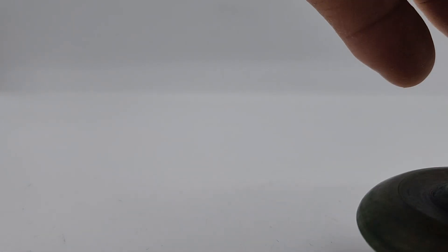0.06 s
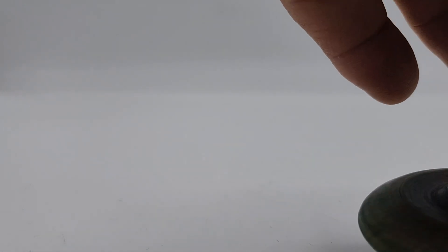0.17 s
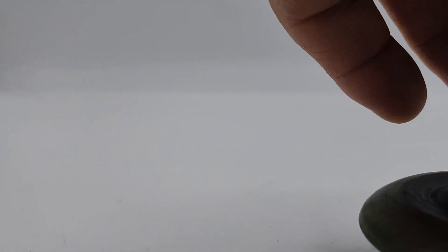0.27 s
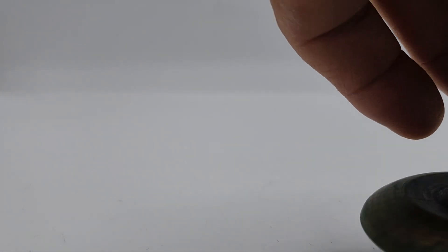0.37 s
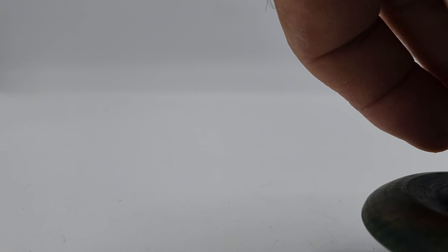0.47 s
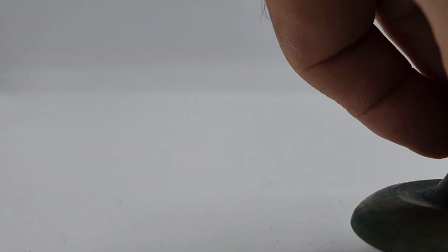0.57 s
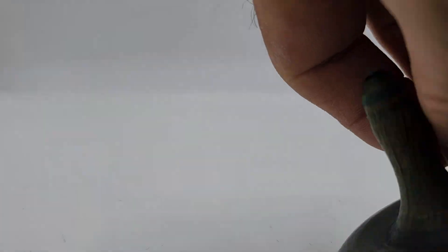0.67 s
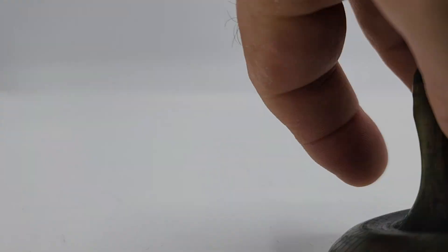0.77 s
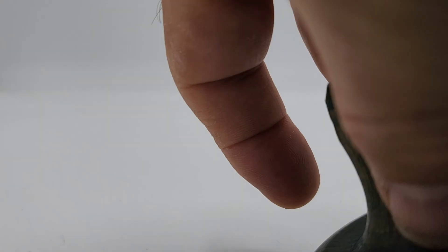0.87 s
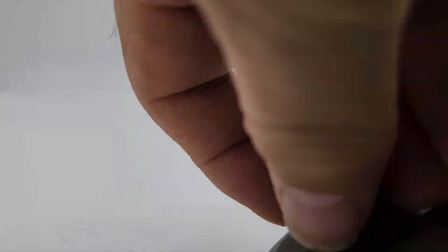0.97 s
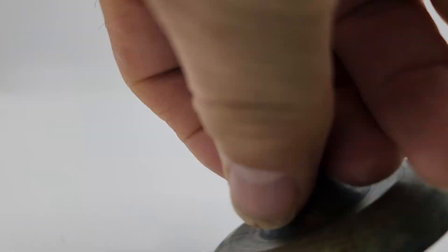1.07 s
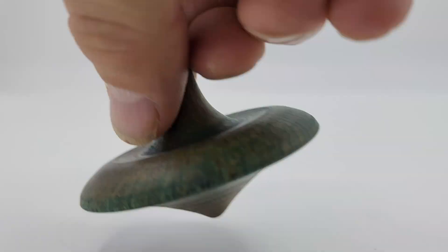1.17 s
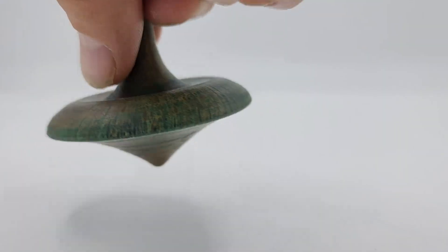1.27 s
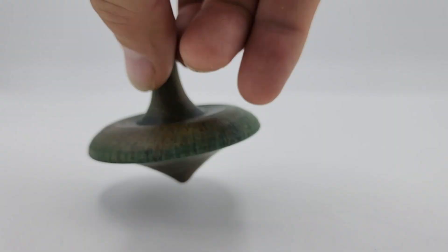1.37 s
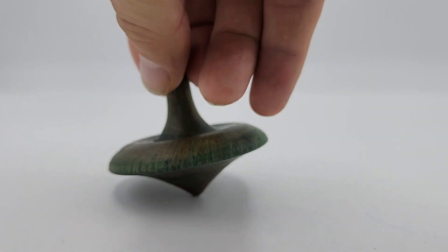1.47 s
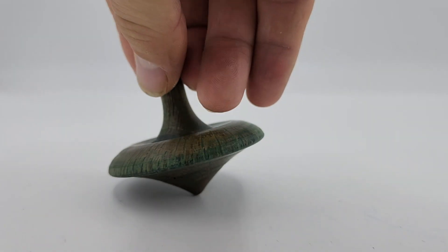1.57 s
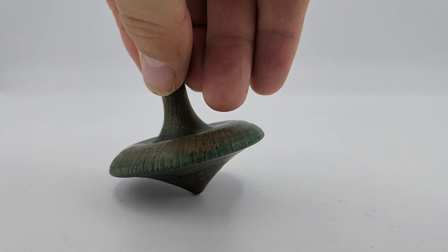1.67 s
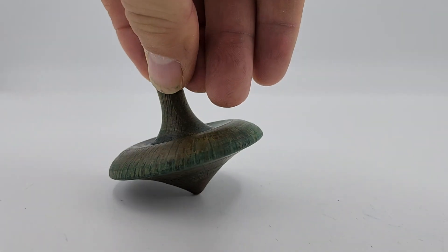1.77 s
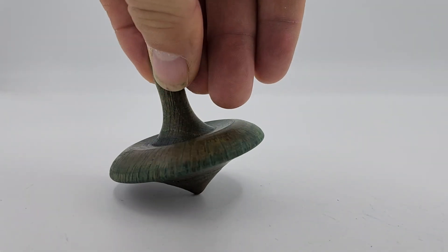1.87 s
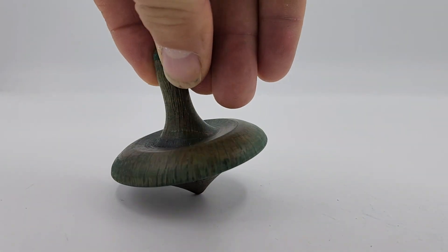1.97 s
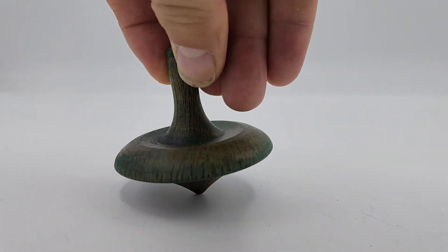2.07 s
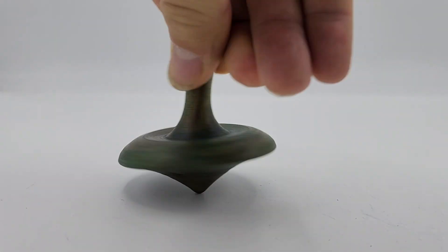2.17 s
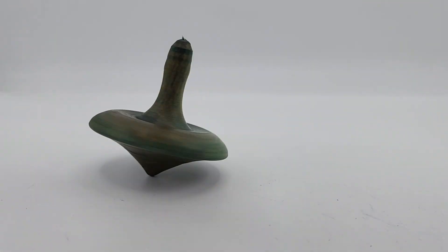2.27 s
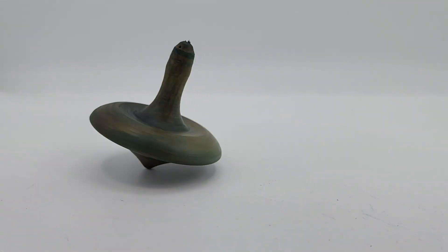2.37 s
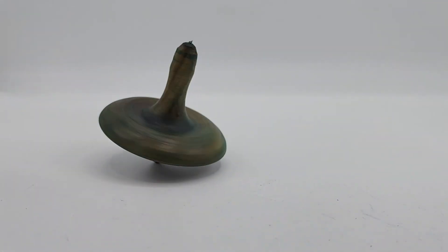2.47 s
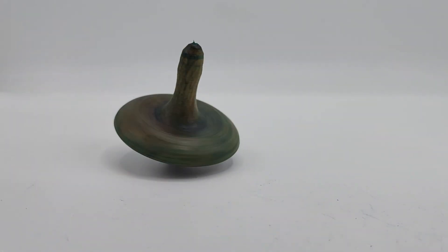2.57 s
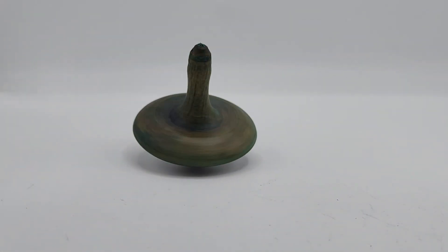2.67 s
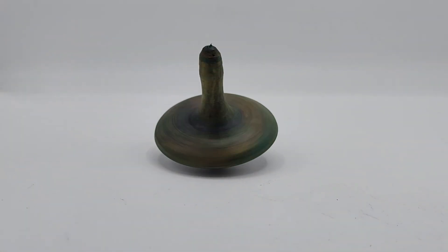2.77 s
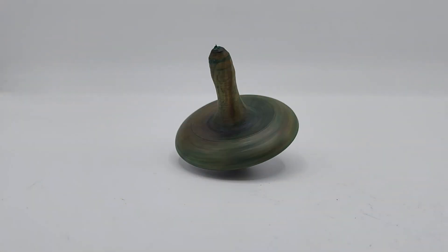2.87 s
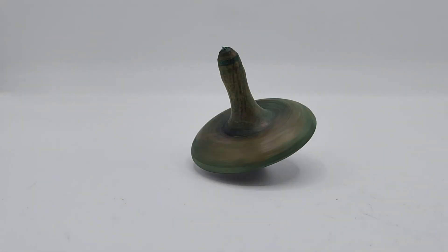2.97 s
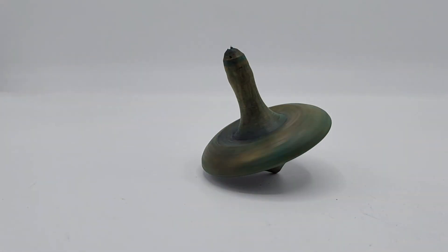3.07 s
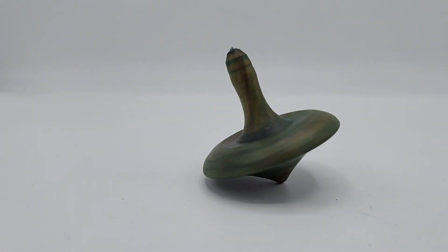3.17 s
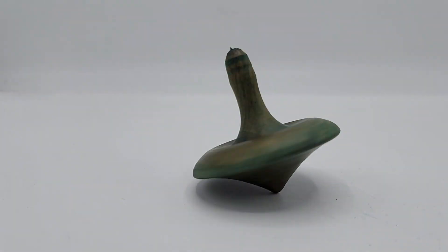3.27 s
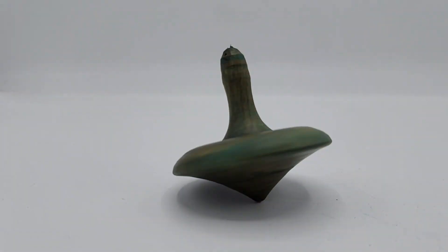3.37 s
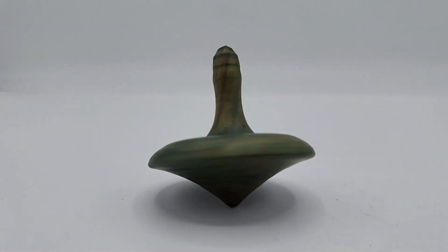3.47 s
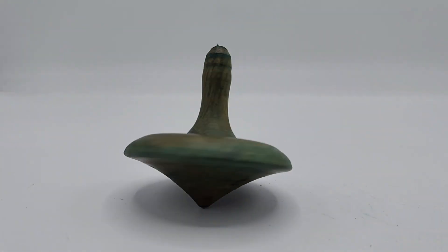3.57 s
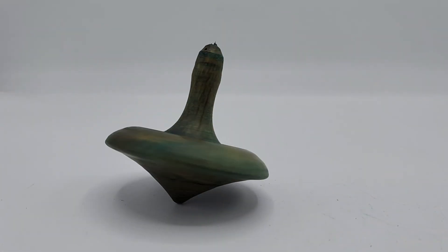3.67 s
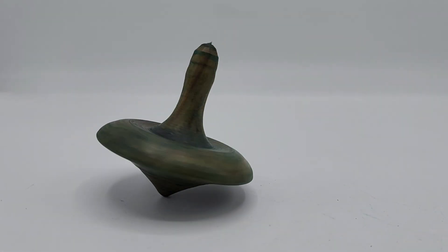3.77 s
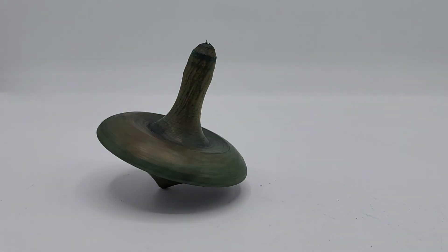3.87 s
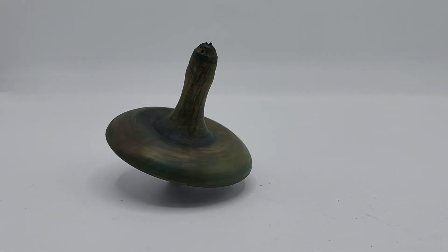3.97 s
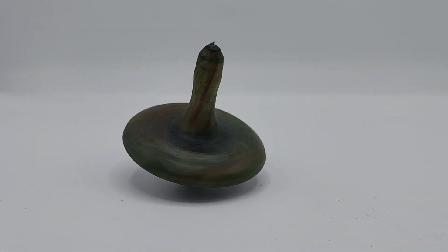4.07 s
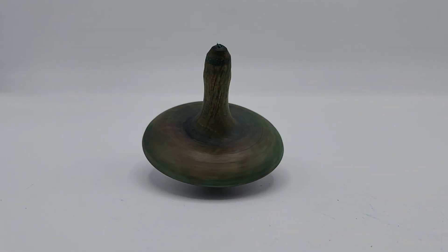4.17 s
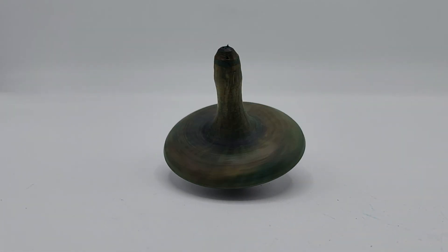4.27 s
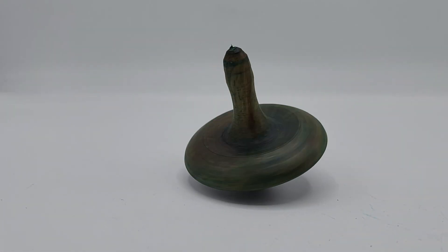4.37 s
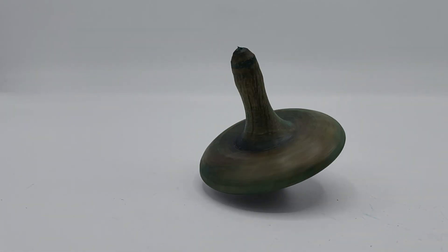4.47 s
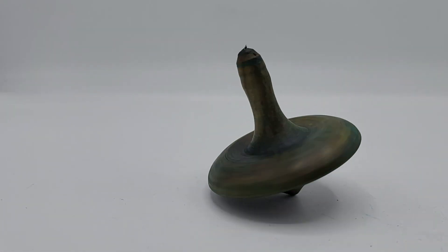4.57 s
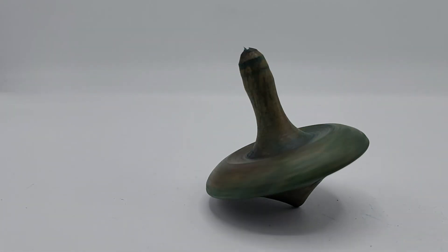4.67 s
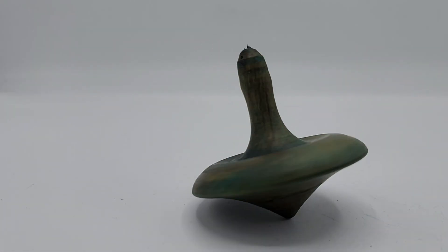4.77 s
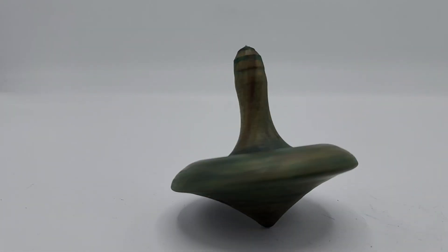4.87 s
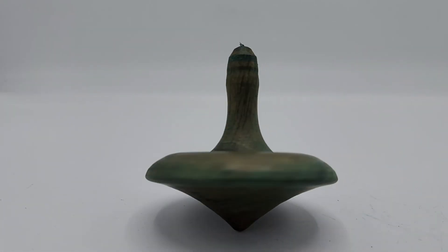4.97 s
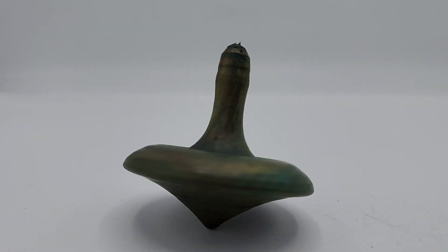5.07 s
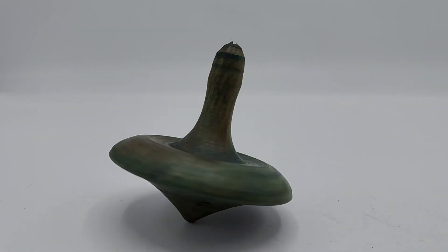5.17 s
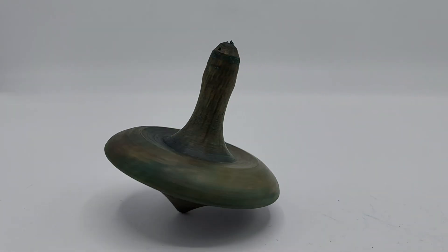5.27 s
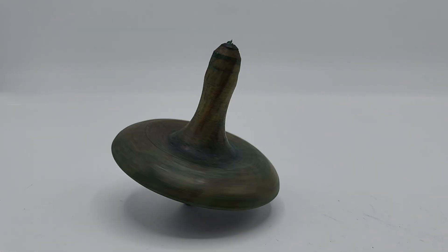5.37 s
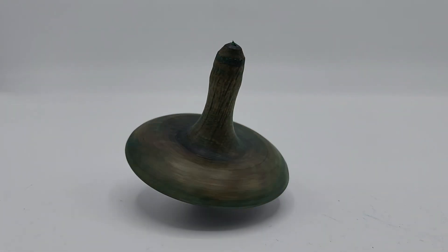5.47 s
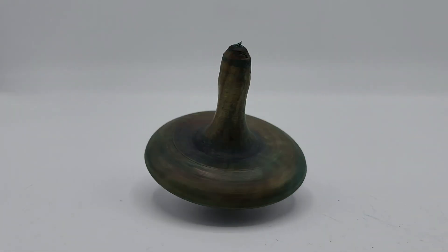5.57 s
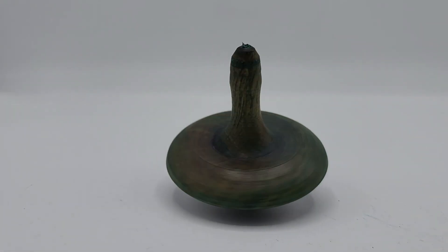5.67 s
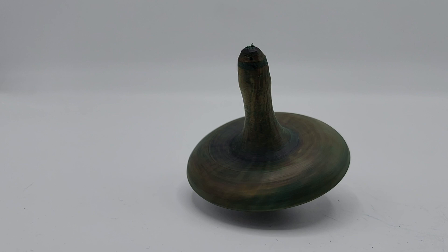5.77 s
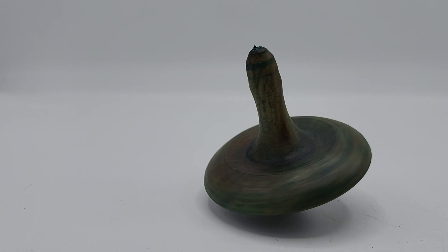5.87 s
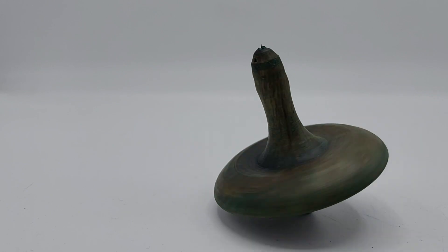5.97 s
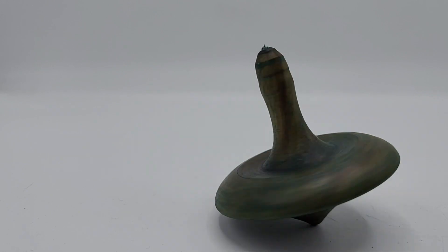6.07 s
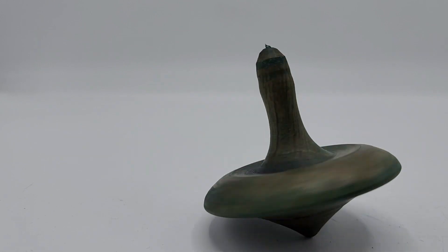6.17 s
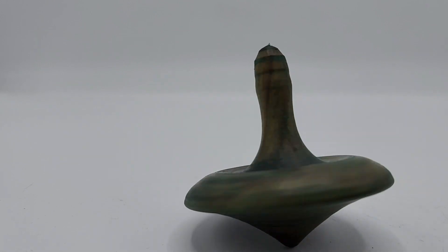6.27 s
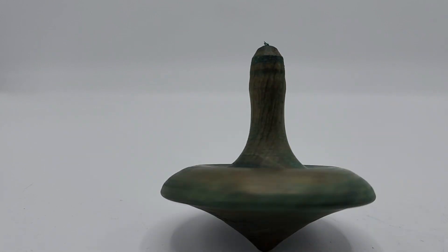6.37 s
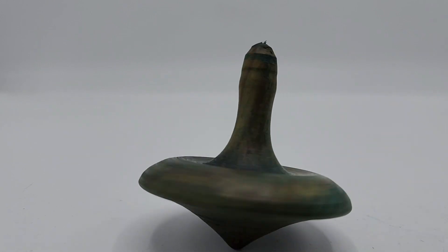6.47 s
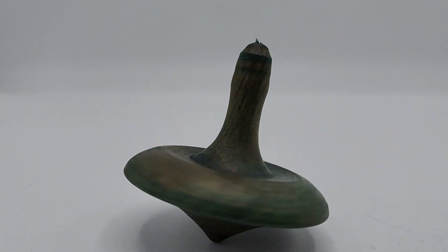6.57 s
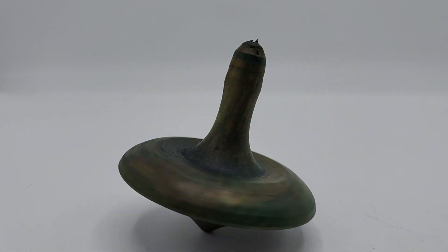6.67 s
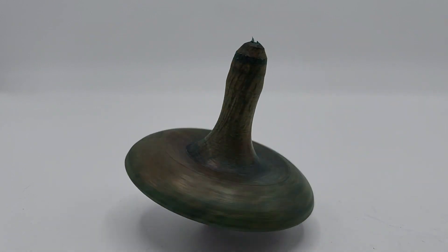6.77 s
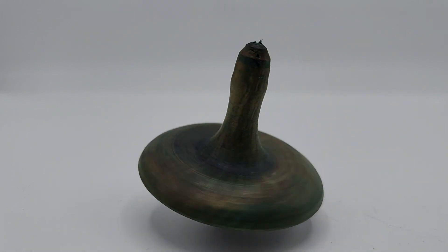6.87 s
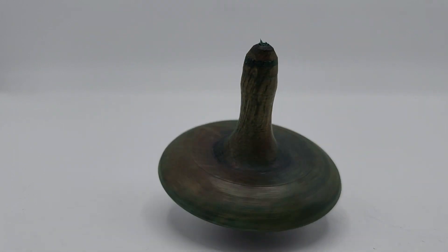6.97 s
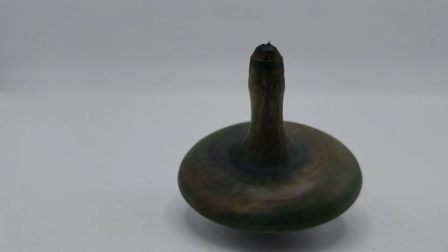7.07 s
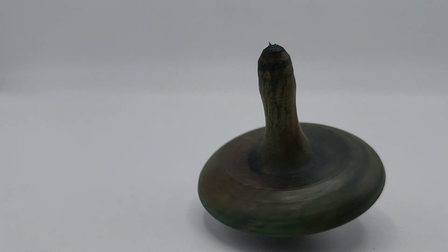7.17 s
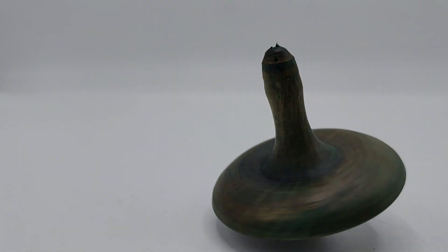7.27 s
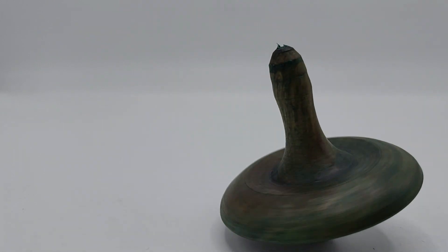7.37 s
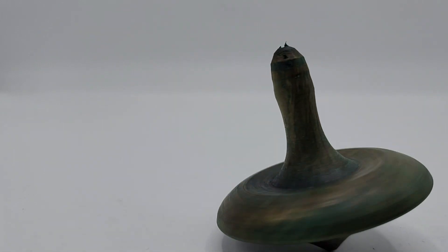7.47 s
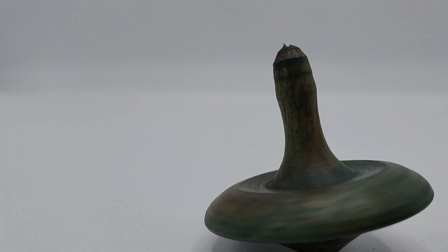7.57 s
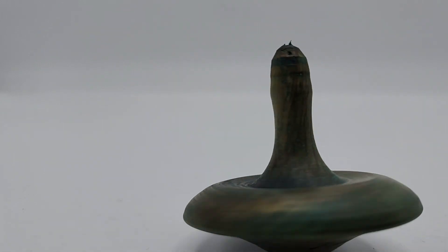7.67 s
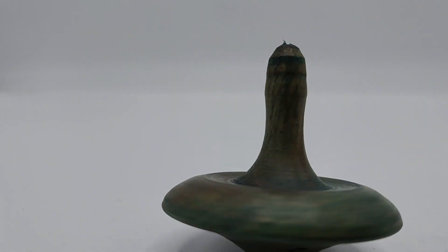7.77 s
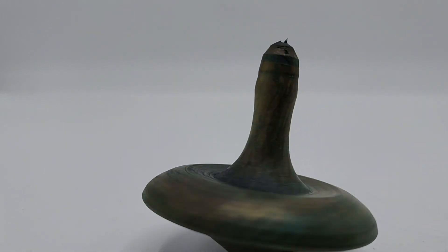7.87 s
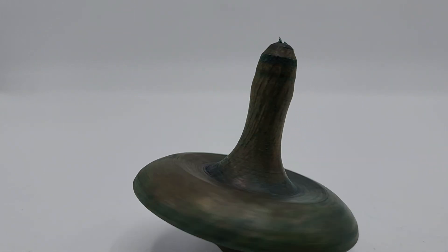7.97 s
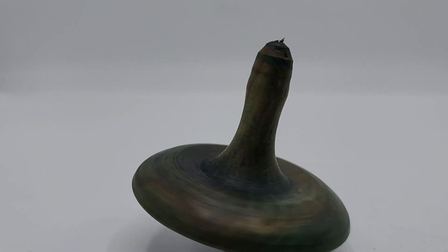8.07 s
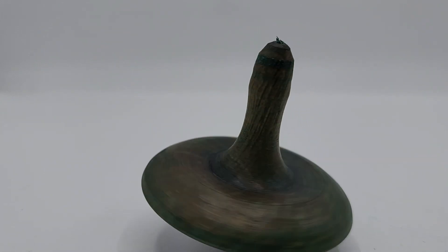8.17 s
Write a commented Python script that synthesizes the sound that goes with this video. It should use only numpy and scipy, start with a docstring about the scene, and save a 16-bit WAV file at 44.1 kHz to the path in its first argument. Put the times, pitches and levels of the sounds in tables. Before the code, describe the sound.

Fingers brush and knock against a wooden top as they pick it up from a hard board. It is set down with one sharp knock, then twirled with a quick rasp of skin and a few more knocks. The top spins with a low, fluttering rumble that swells and eases in slow waves, its tip grinding faintly. Everything is heard close up over the soft hum of a quiet room.

```python
"""Over the hum of a quiet room, skin and sleeve brush and knocks sound close by: fingers pick a wooden
top off a hard board, set it down and twirl it. Its uneven tip bumps the board three times a turn and
drives the low modes into a rumble. Friction slows the top evenly, and the rumble swells once in each
slow circle of its leaning axis (precession). The tip grinds faintly, snaps grit and chirps."""
import sys
import numpy as np
from scipy import signal
from scipy.fft import rfft, irfft
from scipy.io import wavfile
from scipy.ndimage import uniform_filter1d

SR = 44100
rng = np.random.default_rng(int(sys.argv[2]) if len(sys.argv) > 2 else 0)


def store_pcm(level_fs):
    """Save levels as 16-bit WAV."""
    pcm = np.round(np.clip(level_fs, -1, 1) * 32767).astype(np.int16)
    wavfile.write(sys.argv[1], SR, np.atleast_2d(pcm).T)


N = 362943
T = np.arange(N) / SR

# Noise spectra. Each row: frequency in Hz, relative spectral density in dB.
ROOM_SPECTRUM = [(15, -59.5), (25, 3), (75, -11), (133, 5), (281, -29.5), (399, -20.5), (509, -33.5),
                 (1340, -38), (1620, -38.5), (2170, -45), (2490, -46), (4040, -48), (6400, -48),
                 (7600, -39.5), (9300, -61.5), (15500, -54.5)]
HISS_SPECTRUM = [(400, -3), (1000, -21), (1800, -14), (3000, -6.5), (4600, -9), (7500, -0.5), (9500, -7.5),
                 (12000, -4), (15500, -5)]
BRUSH_SPECTRUM = [(150, -24), (330, 3), (620, -2.5), (1000, -13.5), (1500, -15.5), (3000, -24),
                  (8000, -51.5)]
TICK_SPECTRUM = [(300, 6), (900, 3.5), (1400, 7), (2000, 2), (3500, -0.5), (7000, -10.5), (10000, -30),
                 (15500, -27)]
DRY_FRICTION_SPECTRUM = [(700, -21), (1050, 1.5), (1230, -2), (1500, -11.5), (1800, -23), (2050, -6),
                         (2500, -18.5), (3200, -9), (4500, -16), (7000, -37), (12000, -47)]
SKIN_SPECTRUM = [(2500, -22), (4300, -.5), (5400, 1), (6200, -1), (7500, -10), (9000, -35),
                 (10600, -22.5), (12000, -35.5)]
# Normal modes of the board. Each row: frequency in Hz, bandwidth in Hz, gain in dB, polarity.
BOARD_MODES = [(75, 18.1, 13.5, -1), (78.66, 16.4, 14, 1), (113.2, 12, -3.5, -1), (125.2, 24.6, -2, 1),
               (152, 14.1, -8, 1), (164.2, 11, -11.5, 1), (343.9, 25, -2, 1), (384, 7.2, -12, 1),
               (418, 24, -11, 1), (603, 15, -13.5, 1), (637.5, 37, -13.5, 1), (873, 22, -16, 1),
               (1035, 20, -24, 1), (1096, 130, -26.5, 1), (1173, 39, -22.5, 1)]
# Skin and sleeve slide. Each row: start, rise, hold and fade in seconds, then gains in dB of
# hiss, skin rasp and scrape on the board.
SLIDES = [(0.437, 0.028, 0.16, 0.15, -81, -65, -76.5), (0.573, 0.0042, 0.019, 0.013, -43.5, -53, -44),
          (0.589, 0.016, 0.051, 0.064, -35, -48, -48.5), (0.669, 0.0072, 0.078, 0.071, -58, -47, -52.5),
          (0.751, 0.0021, 0.037, 0.14, -39, -73.5, -44.5), (0.818, 0.037, 0.067, 0.094, -91, -48, -40.5),
          (0.995, 0.022, 0.042, 0.21, -74, -59, -91), (1.136, 0.05, 0.2, 0.16, -79.5, -69.5, -71),
          (1.305, 0.052, 0.011, 0.075, -67.5, -50.5, -58.5), (1.44, 0.068, 0.013, 0.16, -77, -60, -60.5),
          (1.612, 0.014, 0.022, 0.06, -70.5, -47, -61), (2.08, 0.053, 0.013, 0.021, -40.5, -34.5, -45.5),
          (2.142, 0.011, 0.016, 0.052, -44, -37.5, -49), (2.174, 0.011, 0.01, 0.12, -59, -55, -44.5),
          (2.692, 0.13, 0.11, 0.12, -73.5, -64, -60), (3.233, 0.028, 0.051, 0.29, -78.5, -89, -84),
          (3.398, 0.1, 0.02, 0.32, -57, -52, -73), (3.539, 0.18, 0.092, 0.16, -62, -60, -59.5),
          (4.61, 0.062, 0.054, 0.43, -78, -81.5, -86)]
# The stem squeaks between fingertips. Each row: start and length in seconds, pitch in Hz, gain in dB.
STEM_SQUEAKS = [(0.455, 0.0057, 5500, -61), (0.468, 0.037, 5450, -59), (0.498, 0.046, 5600, -61),
                (0.575, 0.016, 7200, -37), (0.633, 0.04, 4603, -41.5), (0.684, .05, 5450, -45),
                (1.02, 0.032, 5750, -65), (1.159, 0.027, 5500, -70.5), (1.624, 0.03, 5150, -53),
                (2.121, 0.015, 5350, -34), (2.128, 0.015, 5330, -38)]
# Top and fingers knock. Each row: start in seconds, thud gain in dB, thud pitch in Hz,
# ring gain in dB, contact hardness in Hz, tick gain in dB.
IMPACTS = [(.555, -33.5, 134, -19, 140, -76.5), (0.577, -16.5, 126, -6, 316, -71),
           (0.627, -20, 118, -10, 310, -52), (0.644, -21, 127, -6, 283, -46),
           (0.664, -27, 314, -8, 417, -59), (0.693, -26, 126, -13, 332, -66),
           (.738, -18, 120, -11.5, 217.6, -73), (.758, -5, 361, 1.5, 787, -32.5),
           (0.7641, -14.5, 112.2, -5, 600, -60), (0.833, -43, 123, -12.5, 161, -74),
           (.949, -30, 123, -27, 183, -51.5), (1.3683, -11, 140, -2, 295, -31.5),
           (1.484, -43.5, 141, -18, 163, -64), (1.615, -37.5, 133, -37, 175.6, -71),
           (1.796, -28.5, 129.6, -30, 380, -74.5), (1.885, -44.5, 144, -38, 150, -82),
           (2.098, -31.5, 125, -26, 174, -65), (2.119, -7, 110.3, 0.5, 150, -45),
           (2.144, -13.5, 140, -2.5, 237, -33.5), (2.191, -17.5, 131, -7.5, 195, -35),
           (2.215, -33, 130, -35, 170, -47)]
# Dry, mid-pitched scuffs of the tip or a brushing sleeve.
# Each row: start, rise, hold and fade in seconds, gain in dB.
DRY_SCUFFS = [(1.364, 0.0043, 0.0071, .04, -50.5), (1.42, .05, 0.29, .2, -86), (3.45, .3, .11, .15, -69)]
# Grains snap under the tip. Each row: start in seconds, gain in dB.
GRIT_SNAPS = [(2.879, -53), (3.157, -43)]
# The main, second and third bump. Each entry: place round the tip in turns.
BUMP_PLACES = [.788, .121, .419]
# One swell for each circle of the axis. Each row: start, rise, hold and fade in seconds, then gains in
# dB of the main bump, its opening surge, the second and third bump against the main, and the grinding.
PRECESSION_SWELLS = [(2.432, .17, 0.933, 0.21, -17.5, 7.5, -10.5, -6, 1.5),
                     (3.739, 0.29, 0.93, 0.9, -18.5, 7.5, -5, -6.5, 0.5),
                     (5.15, 0.29, 0.86, 1.56, -16, 2, -10.5, -8, 0.5),
                     (6.6, 0.37, 0.66, 1.04, -16.5, -2.5, -10.5, -13, -1),
                     (7.95, 0.3, .3, 1.2, -26, -1, -12, -8, 1)]

SPIN_START_S, START_TURNS_PER_S, SLOWING_TURNS_PER_S2 = 2.271, 16.556, .467
PRECESSION_S, CONTACT_SWING_TURNS = 1.43, .0333
SURGE_AFTER_RISE_S, SURGE_WIDTH_S = .12, .26
MAIN_BUMP_FLOOR_DB, GRIND_FLOOR_DB = -37.5, -9
CHIRP_SPAN_S, CHIRP_RANGE_HZ = (4.1, 5.05), (2700, 3700)


def undb(db):
    """Amplitude grows tenfold for every 20 dB."""
    return 10 ** (np.asarray(db) / 20)


def unit(x):
    """Normalisation to rms 1."""
    return x / np.sqrt(np.mean(x ** 2))


def noise(spectrum):
    """Spectral shaping gives two independent noises of one colour, rms 1."""
    hz, db = np.transpose(spectrum)
    bins_hz = np.maximum(np.fft.rfftfreq(N, 1 / SR), 1)
    gain = undb(np.interp(np.log(bins_hz), np.log(hz), db))
    return unit(irfft(rfft(rng.standard_normal((2, N))) * gain, N))


def flicker(rate_hz):
    """Interpolated random values fluctuate with a spread near 1."""
    count = int(N / SR * rate_hz) + 2
    return 1.2 * np.interp(T * rate_hz, np.arange(count), rng.standard_normal(count))


def cut(x, hz, kind, order=2):
    """A maximally flat low-pass or high-pass filter."""
    return signal.sosfilt(signal.butter(order, hz, kind, fs=SR, output="sos"), x + 1e-18)


def add(track, start, sound):
    """Superposition of a short sound on a track."""
    i = int(start * SR)
    track[..., i:i + sound.shape[-1]] += sound[..., :max(N - i, 0)]


def stroke(start, rise, hold, fade):
    """An envelope rises, holds, then decays exponentially by 30 dB per fade time."""
    attack = np.clip((T - start) / rise, 0, 1) ** 2
    return attack * undb(-30 * np.clip((T - start - rise - hold) / fade, 0, 10))


def pan(x, left_db, shade=.2):
    """Level difference gives direction; the shaded share reaches the right later and duller."""
    right = (1 - shade) * x + shade * cut(x, 170, "low", order=1)
    return np.array([x, right]) * undb(np.array([[left_db], [-left_db]]) / 2)


def room():
    """Ambient noise: a wavering hum, coherent on both sides, under steady diffuse air."""
    air = noise(ROOM_SPECTRUM) * undb(-61)
    hum = cut(air[0], 380, "low") * undb(1 + 3 * flicker(11))
    return pan(hum, left_db=5.5), undb(4) * cut(air, 320, "high")


def reflections(air):
    """Early reflections from close walls interfere with the direct sound and colour each side."""
    t = T[:SR // 16]
    echoes = rng.standard_normal((2, len(t))) * np.exp(-t / .012)
    echoes /= np.sqrt(np.sum(echoes ** 2, axis=1, keepdims=True))
    return .7 * air + .7 * signal.fftconvolve(air, echoes, axes=1)[:, :N]


def board(force):
    """Modal superposition: the board's response is the sum of its resonances."""
    return sum(sign * undb(db) * signal.lfilter(*signal.iirpeak(hz, hz / width, fs=SR), force + 1e-18)
               for hz, width, db, sign in BOARD_MODES)


def scraping(low_hz, high_hz):
    """Uneven friction is a random force that excites the board's upper modes; rms 1."""
    roughness = undb(4 * flicker(220))
    force = cut(rng.standard_normal(N) * roughness, low_hz, "high", order=6)
    return unit(board(cut(force, high_hz, "low", order=6)))


def chirp(length, hz):
    """Stick-slip oscillation gives a short trembling note with a weak second harmonic."""
    count = int(length * SR)
    tremble = uniform_filter1d(rng.standard_normal(count), size=40)
    phase = 2 * np.pi * np.cumsum(hz * (1 + .13 * tremble)) / SR
    return np.hanning(count) * (np.sin(phase) + undb(-20) * np.sin(2 * phase))


def rubbing():
    """Sliding friction of skin and cloth hisses, squeaks and scrapes the board."""
    hiss, rasp, scrape = np.zeros((3, N))
    for *timing, hiss_db, rasp_db, scrape_db in SLIDES:
        slide = stroke(*timing)
        hiss += undb(hiss_db) * slide
        rasp += undb(rasp_db) * slide
        scrape += undb(scrape_db) * slide
    skin = undb(-11.5) * noise(SKIN_SPECTRUM)
    air = (hiss * noise(HISS_SPECTRUM) + rasp * skin) * undb(2 * flicker(250))
    for start, length, hz, db in STEM_SQUEAKS:
        add(air, start, undb(db) * chirp(length, hz))
    wood = undb(-10.5) * scraping(low_hz=274, high_hz=1420) + undb(-6.5) * noise(BRUSH_SPECTRUM)[0]
    return pan(scrape * wood, left_db=5), air


def contact_force(hardness_hz):
    """A smooth pulse of constant impulse: the harder the contact, the shorter it lasts."""
    t = T[:SR // 20]
    force = t ** 4 * np.exp(-4 * np.pi * hardness_hz * t)
    return force / force.sum() * SR / 700


def knocks():
    """Impact excitation: each knock thuds, sets the board ringing and ticks at the contact."""
    thuds, force, ticks = np.zeros((3, N))
    t = T[:SR // 4]
    for start, thud_db, thud_hz, ring_db, hardness_hz, tick_db in IMPACTS:
        age = t * thud_hz / 1.033  # the thud crests after about one cycle
        swell = (age * np.exp(1 - age)) ** 2.7
        add(thuds, start, undb(thud_db) * swell * np.sin(2 * np.pi * thud_hz * t))
        add(force, start + .0022, undb(ring_db) * contact_force(hardness_hz))
        add(ticks, start, undb(tick_db) * (np.exp(-t / .003) + .012 * np.exp(-t / .0064)))
    ring = board(cut(force, 112, "high", order=4))  # the hand on the top damps the deepest modes
    body = undb(-.2) * pan(thuds + ring, left_db=2.3, shade=.35)
    return body, noise(TICK_SPECTRUM) * ticks


def motion():
    """Uniform deceleration with precession: turns of the tip, circles of the axis, turns/s lost."""
    age = np.maximum(T - SPIN_START_S, 0)
    speed_lost = SLOWING_TURNS_PER_S2 * age
    circles = age / PRECESSION_S
    swing = CONTACT_SWING_TURNS * np.sin(2 * np.pi * circles)  # the lean shifts the contact on the tip
    turns = (START_TURNS_PER_S - speed_lost / 2) * age - swing
    return turns, circles, speed_lost


def contact_loads(circles):
    """Precession modulates how hard the three bumps and the grinding bear on the board."""
    main, second, third, grind = np.zeros((4, N))
    for start, rise, hold, fade, main_db, surge_db, second_db, third_db, grind_db in PRECESSION_SWELLS:
        swell = stroke(start, rise, hold, fade)
        surge = np.exp(-((T - start - rise - SURGE_AFTER_RISE_S) / SURGE_WIDTH_S) ** 2)
        load = swell * undb(main_db + surge_db * surge)
        main += load
        second += load * undb(second_db)
        third += load * undb(third_db)
        grind += swell * undb(grind_db)
    lean = undb(2 * np.cos(4 * np.pi * (circles - .27)))  # the lesser bumps bear harder twice a circle
    bump_loads = np.maximum(main, undb(MAIN_BUMP_FLOOR_DB)), second * lean, third * lean
    return bump_loads, np.maximum(grind, undb(GRIND_FLOOR_DB))


def dry_friction(friction):
    """Friction noise: the tip hisses, snaps grit and chirps; the tip or a brushing sleeve scuffs."""
    scuffs = sum(undb(db) * stroke(*timing) for *timing, db in DRY_SCUFFS)
    air = noise(DRY_FRICTION_SPECTRUM) * (undb(-10.5) * friction + scuffs)
    t = T[:2000]
    for start, db in GRIT_SNAPS:
        burst = cut(rng.standard_normal((2, len(t))), 910, "high")
        add(air, start, undb(db) * cut(burst, 2770, "low", order=4) * np.exp(-t / .0075))
    lowest, highest = np.transpose([CHIRP_SPAN_S, CHIRP_RANGE_HZ, (0, 1)])
    for start, hz, strength in rng.uniform(lowest, highest, size=(40, 3)):
        add(air, start, undb(-7) * strength * friction[int(start * SR)] * chirp(.0092, hz))
    return air


def grinding(turns, load, speed_lost):
    """Friction at the tip peaks just after the main bump and grows weaker and duller as the top slows."""
    pulse = undb(1.5 * np.cos(2 * np.pi * (turns - BUMP_PLACES[0] - .2))) * (T > SPIN_START_S)
    low = pulse * load ** 1.1 * undb(-61 - 3 * speed_lost)
    high = pulse * load ** .52 * undb(-66 - 5.5 * speed_lost)
    wood = low * scraping(low_hz=254, high_hz=480) + high * scraping(low_hz=540, high_hz=1400)
    return pan(wood, left_db=3.5, shade=.3), dry_friction(high)


def rumble(turns, bump_loads, speed_lost):
    """Forced vibration: three rounded impulses a turn drive the low modes of the board."""
    force = np.zeros(N)
    for place, load in zip(BUMP_PLACES, bump_loads):
        hits = np.flatnonzero(np.diff(np.floor(turns - place)))
        force[hits] += load[hits] * undb(1.4 * rng.standard_normal(len(hits)))
    rounded = signal.sosfiltfilt(signal.butter(3, [46, 190], "band", fs=SR, output="sos"), force)
    edge = signal.sosfiltfilt(signal.butter(2, [190, 265], "band", fs=SR, output="sos"), force)
    edge *= undb(4.5 - 9.5 * speed_lost)  # fast bumps have a harder edge
    return pan(undb(35) * board(rounded + edge), left_db=1, shade=.15)


def spinning_top():
    """One rotation modulates both rumble and grinding, so they keep in step."""
    turns, circles, speed_lost = motion()
    bump_loads, grind_load = contact_loads(circles)
    grind, air = grinding(turns, grind_load, speed_lost)
    return rumble(turns, bump_loads, speed_lost) + grind, air


def scene():
    """Each source gives a low body and an airborne treble; only the treble gains reflections."""
    bodies, airs = zip(spinning_top(), knocks(), rubbing(), room())
    return sum(bodies) + undb(2.5) * reflections(sum(airs))


def record(dry):
    """Band limiting: a steep low-pass removes the treble above 15.8 kHz."""
    return signal.sosfilt(signal.ellip(10, .2, 80, 15800, fs=SR, output="sos"), dry)


dry = scene()
out = record(dry)
store_pcm(out)
```